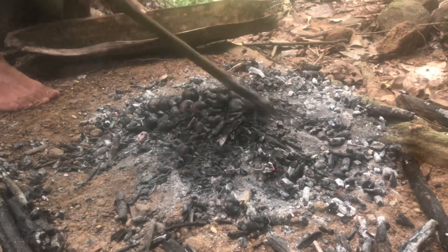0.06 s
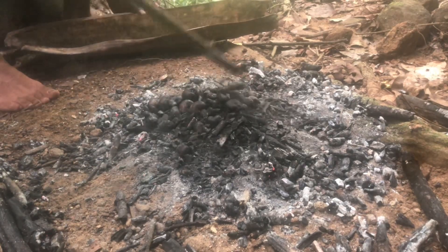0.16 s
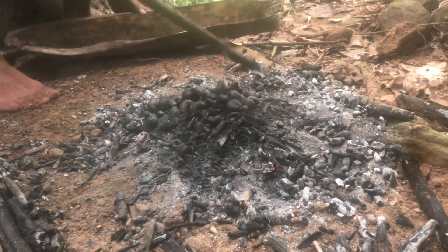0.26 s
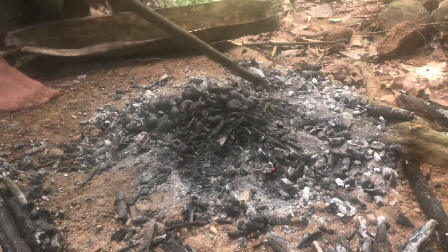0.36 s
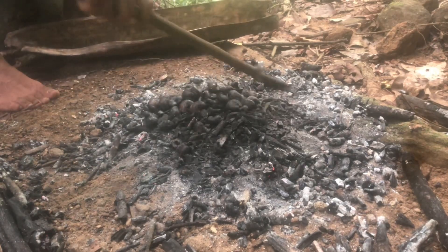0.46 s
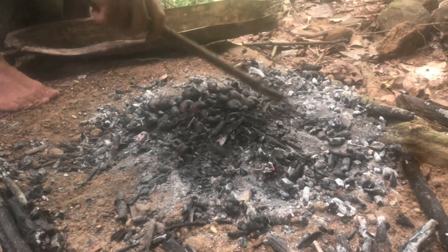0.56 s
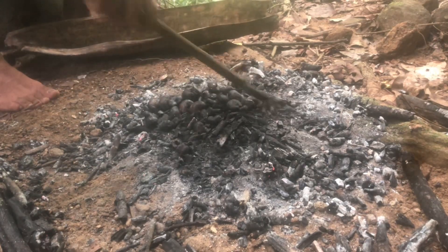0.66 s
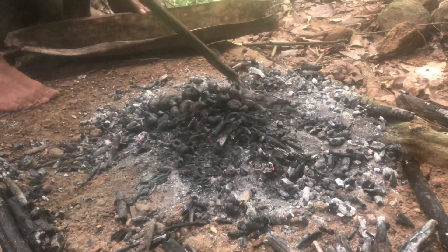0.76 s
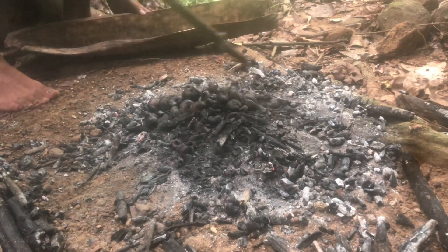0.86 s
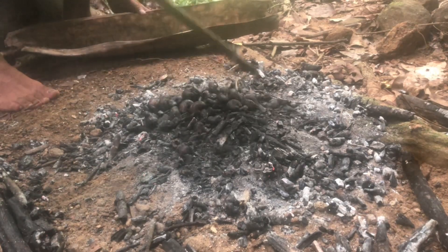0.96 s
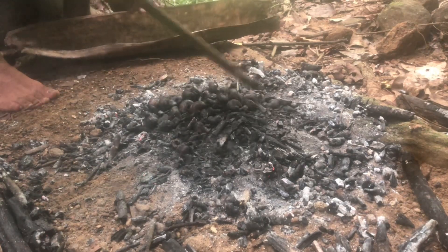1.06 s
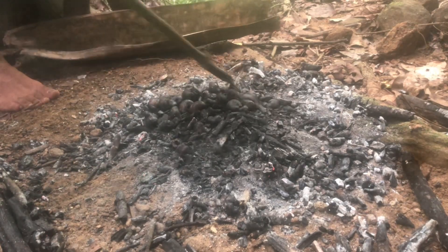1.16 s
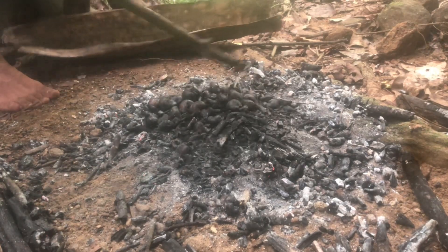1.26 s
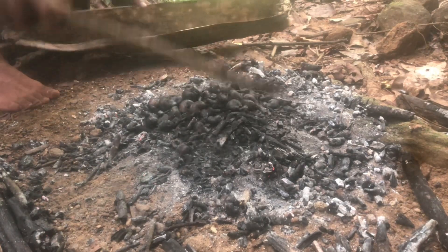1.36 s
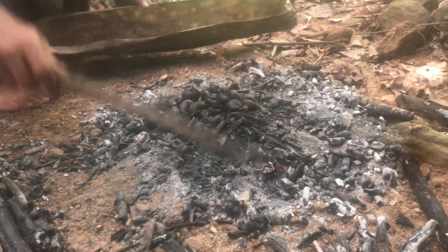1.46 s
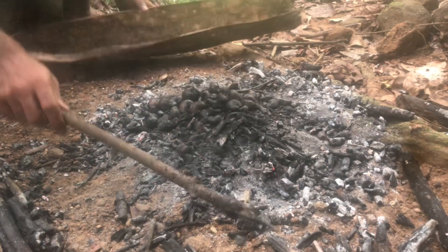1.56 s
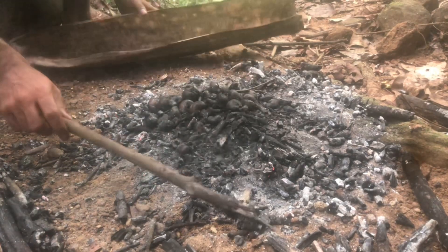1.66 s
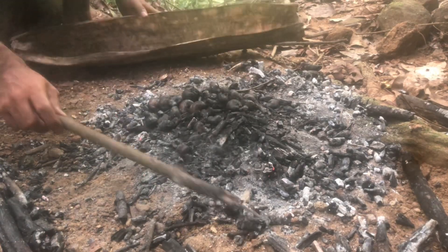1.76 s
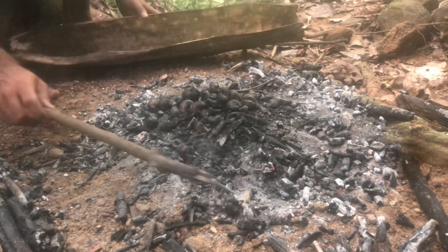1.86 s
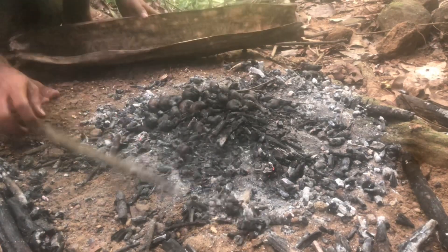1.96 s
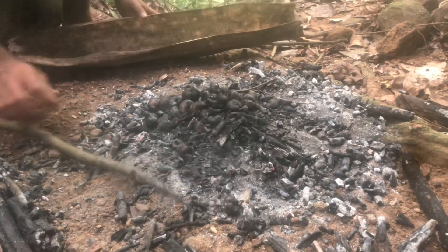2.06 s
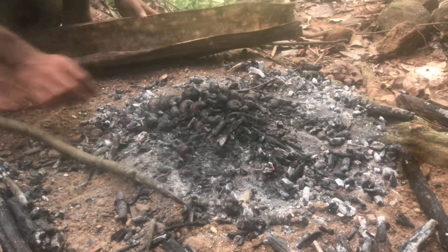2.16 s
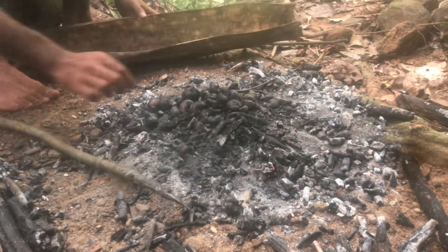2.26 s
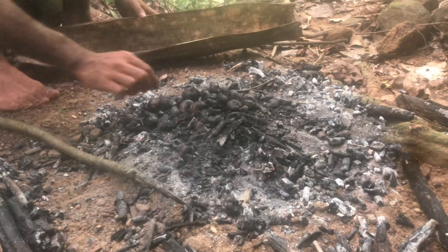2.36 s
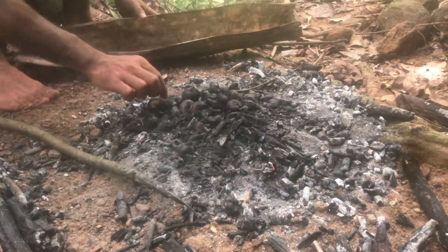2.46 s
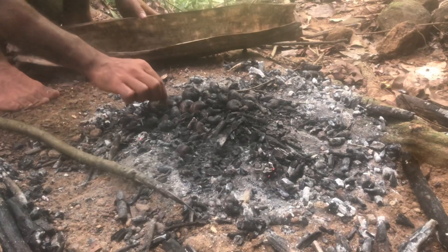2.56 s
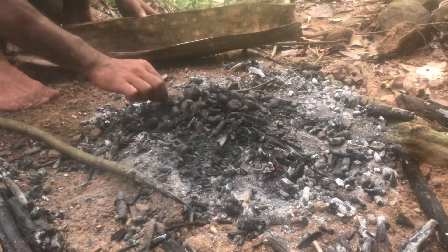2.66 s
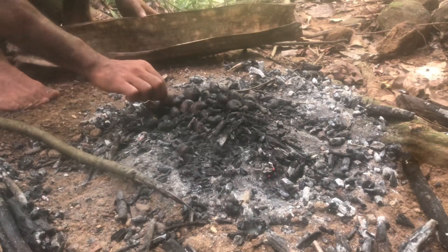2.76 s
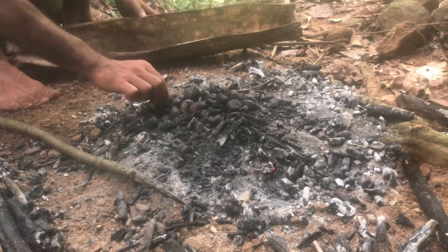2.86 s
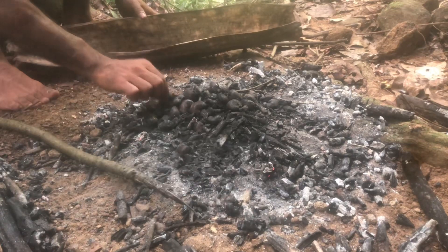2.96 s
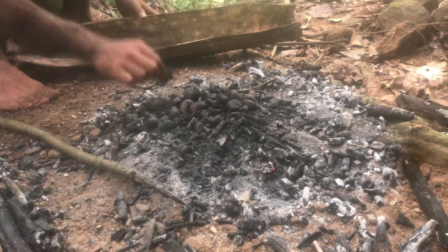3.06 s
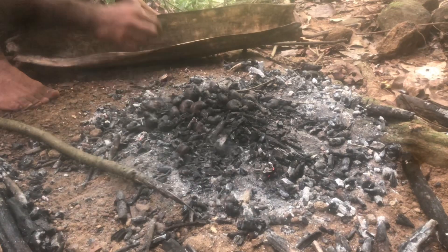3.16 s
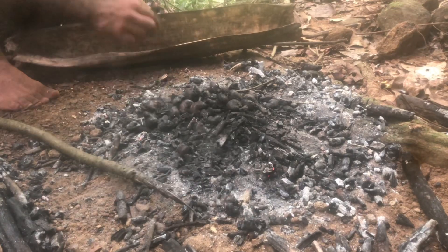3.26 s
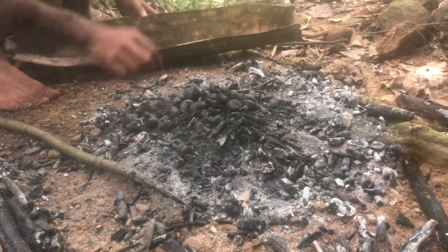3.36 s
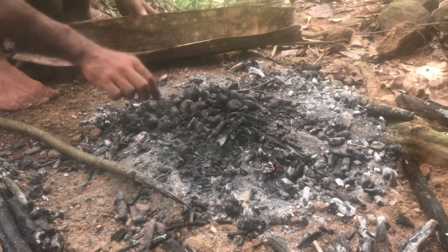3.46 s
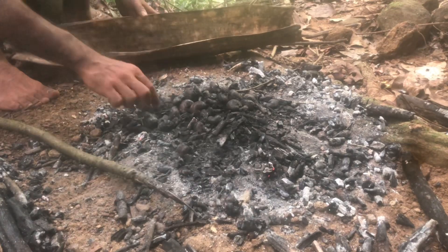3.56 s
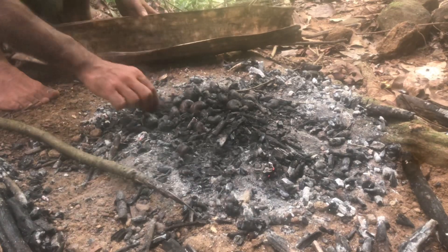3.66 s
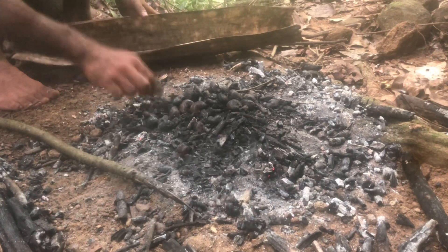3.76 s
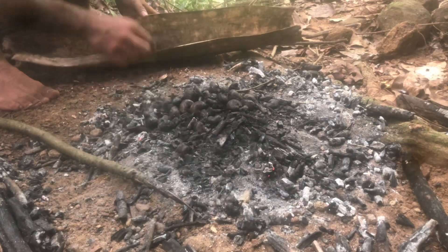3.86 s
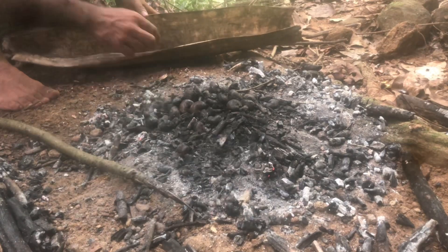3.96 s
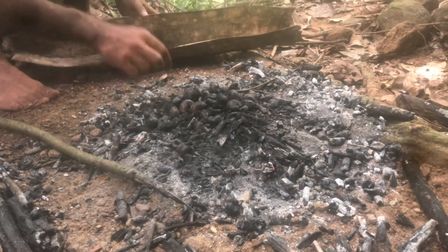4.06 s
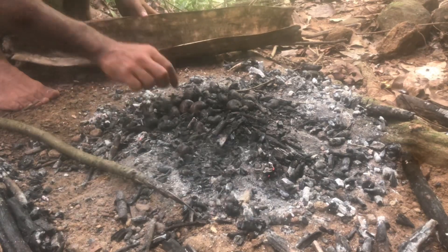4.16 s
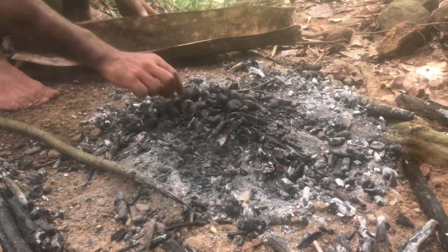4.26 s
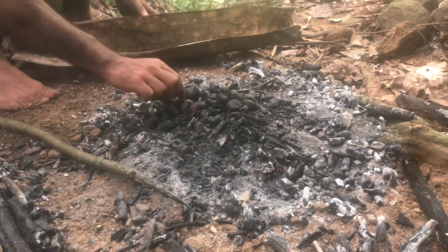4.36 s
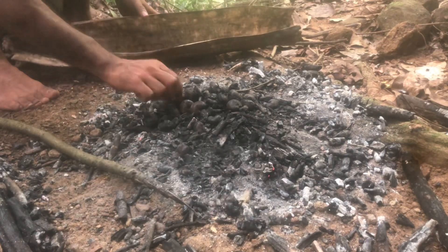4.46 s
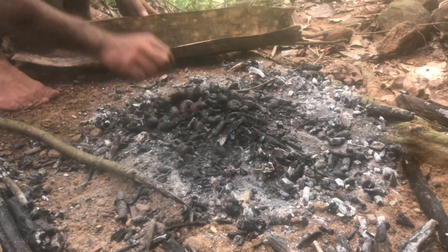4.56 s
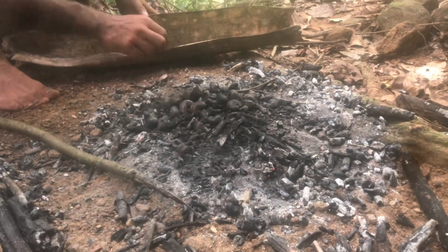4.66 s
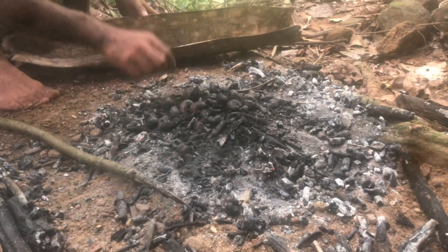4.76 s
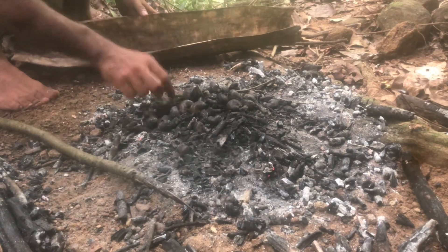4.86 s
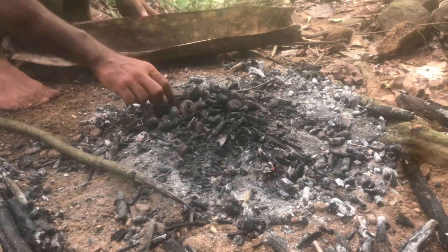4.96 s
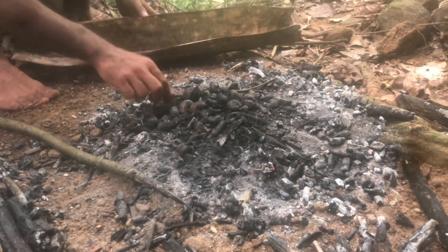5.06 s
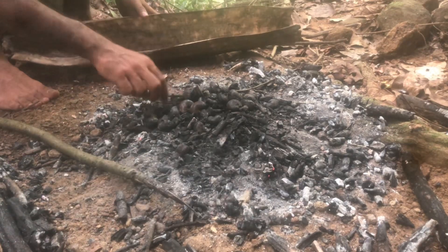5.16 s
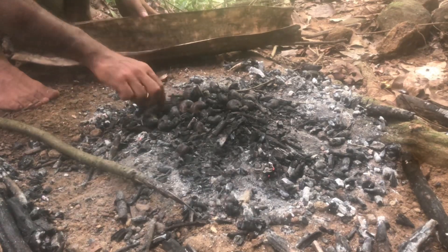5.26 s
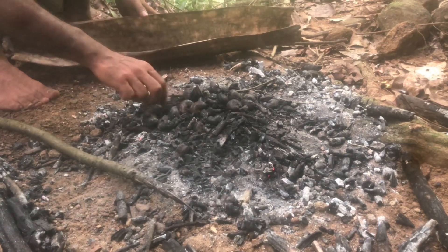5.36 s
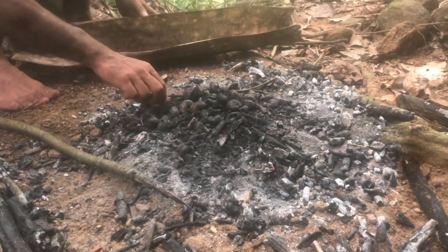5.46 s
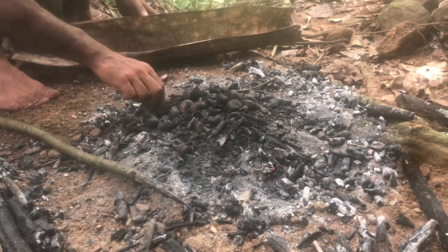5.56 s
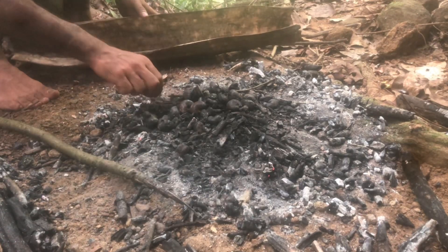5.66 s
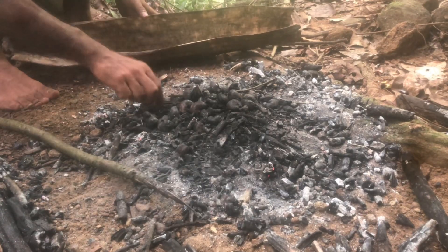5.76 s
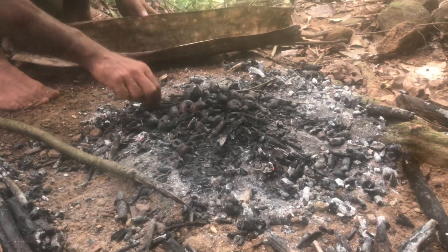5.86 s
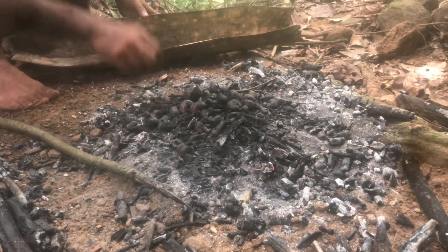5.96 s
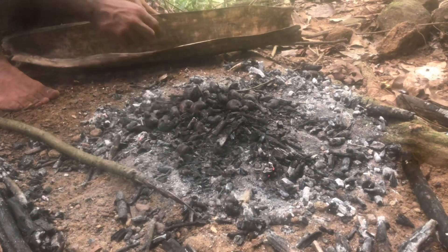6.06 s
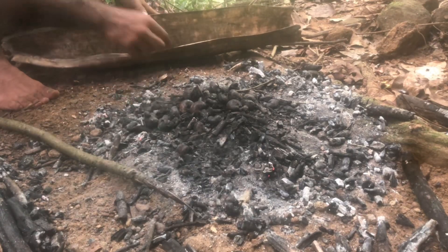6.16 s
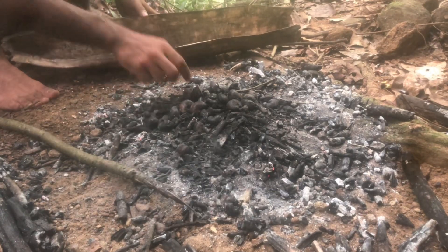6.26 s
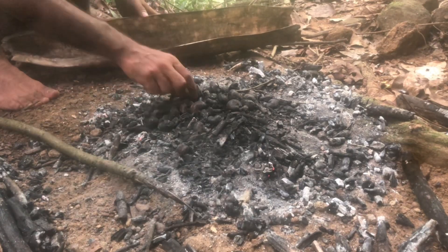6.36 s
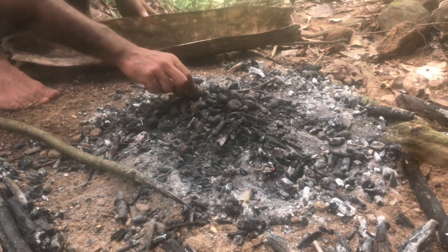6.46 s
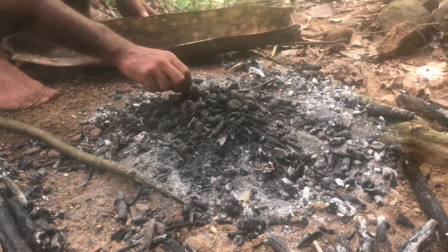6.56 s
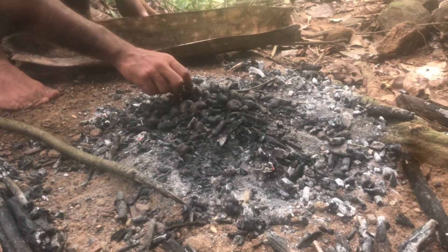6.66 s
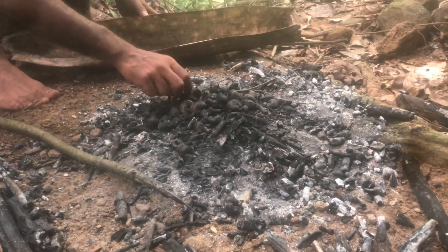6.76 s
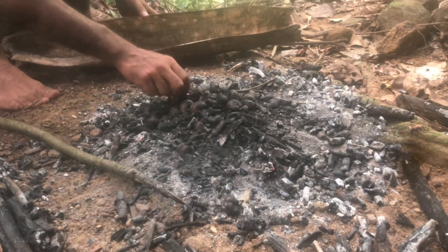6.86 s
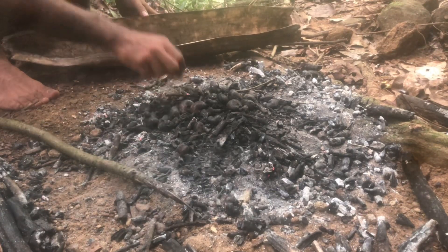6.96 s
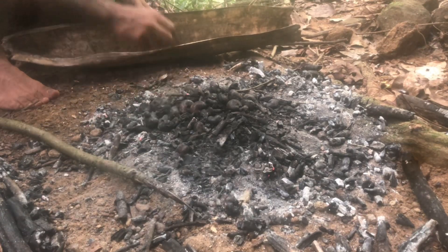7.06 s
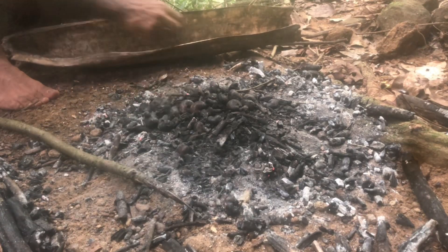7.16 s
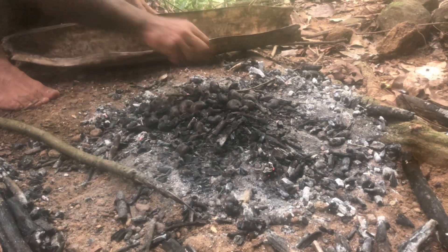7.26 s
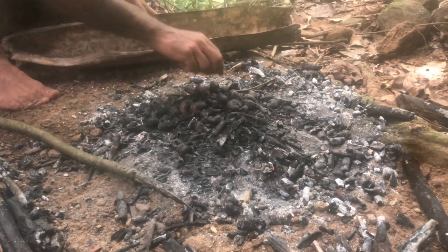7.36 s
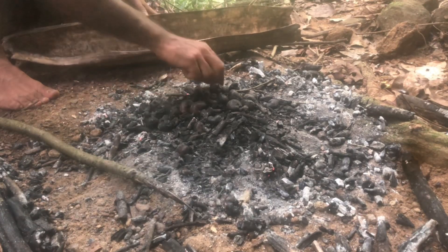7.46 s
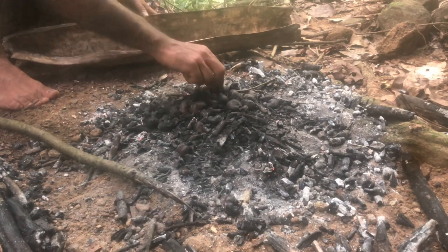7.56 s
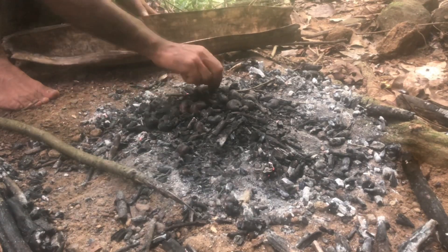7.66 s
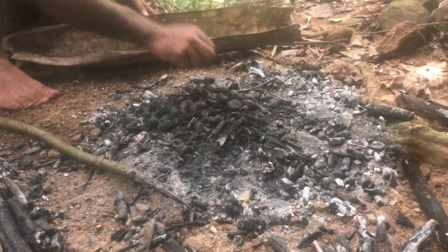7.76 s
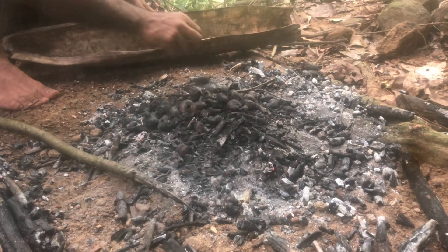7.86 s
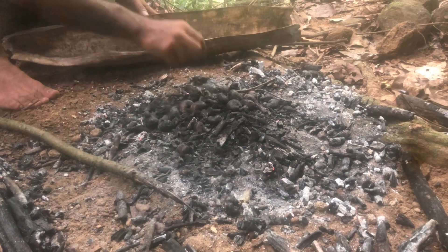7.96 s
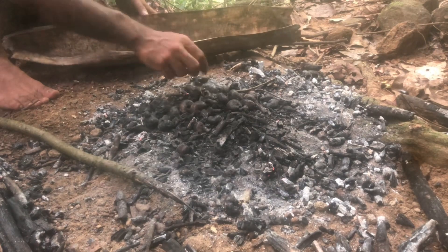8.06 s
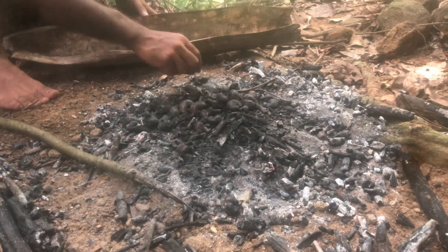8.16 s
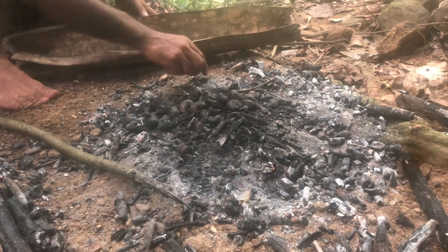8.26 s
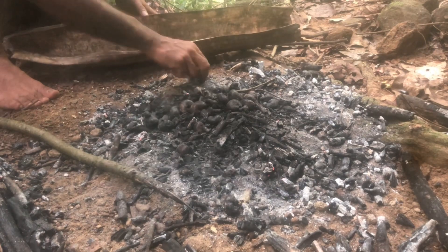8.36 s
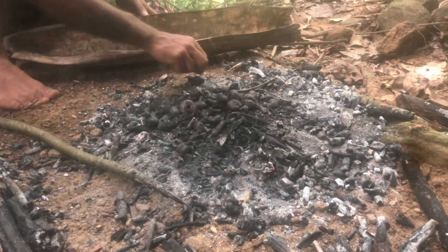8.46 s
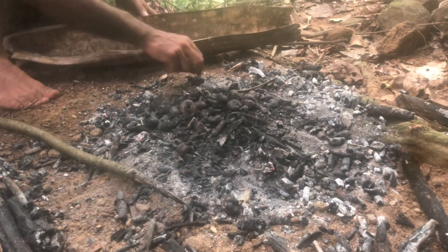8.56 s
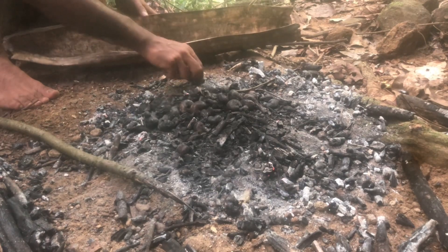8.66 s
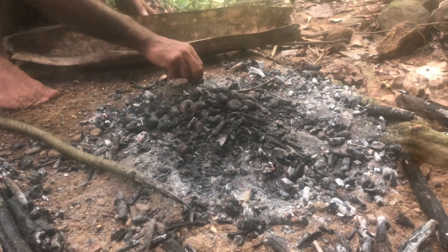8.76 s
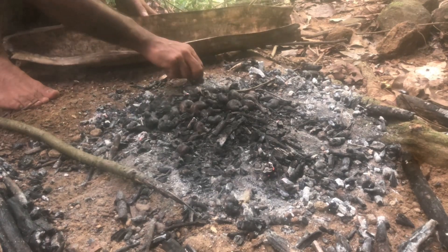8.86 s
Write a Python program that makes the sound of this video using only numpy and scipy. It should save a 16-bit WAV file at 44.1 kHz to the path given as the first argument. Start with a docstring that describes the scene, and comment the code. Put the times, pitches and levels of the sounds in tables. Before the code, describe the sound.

A quiet forest clearing, heard close: soft air, high insects hissing in gentle swells, and a very faint distant engine rising in pitch until about 3.2 s, then dropping and fading. From 0 to 1.9 s a stick rakes burnt charcoal with tiny crisp clicks, brittle snaps and short ashy scrapes, busiest around 1.2 and 1.8 s. At 2.0 s the stick drops with a light dry clack. At 3.3 s a softer woody tap leads to a loud hollow knock at 3.5 s as a nut hits a hollowed log, then rattles until 3.8. Another knocks at 4.1 and bounces at 4.25, fading quickly. Near quiet follows, with a tiny click at 4.9. A third nut lands at 6.2, bouncing at 6.4; a fourth clonks lower at 7.25, wobbling in dwindling taps until about 8.2. Faint crumbs settle from 8.2 to 8.8 s. Echo is short and subtle.

```python
"""A stick rakes the charcoal of a burnt-down fire in a forest and is dropped; nuts are then tossed into a log.
Raking is a dense run of clicks in filtered colours; each charcoal click is a coloured snap.
The stick and the nuts ring as dying sine modes, with coloured snaps for the shell's tick and the crunch.
A short tail of decaying noise echoes them. Behind lie filtered-noise air, insects hissing in three noise
bands that swell and sink, and a far engine of a few low harmonics over a rumble."""
import sys
import numpy as np
from scipy import signal
from scipy.fft import rfft, irfft
from scipy.io import wavfile

SR = 44100
rng = np.random.default_rng(int(sys.argv[2]) if len(sys.argv) > 2 else 0)


def digitize_waveform(pressure):
    """Quantize a signal to 16-bit integers and store it at the path in sys.argv[1].

    Rows of a 2-D input are taken as channels; values are limited to [-1, 1].
    """
    field = np.atleast_2d(pressure).T
    bounded = np.clip(field, -1, 1)
    quanta = np.round(bounded * 32767).astype(np.int16)
    wavfile.write(sys.argv[1], SR, quanta)


N = 393372

# A nut lands, bounces or wobbles in the log. Each row: contact in seconds, nominal level in dB, strongest ring in Hz,
# spread of the ring in octaves (0.15 at least is used), travel of the bending wave in seconds at 1 kHz,
# nominal thud in dB re level, bite of the shell in dB, crunch in Hz.
KNOCKS = [(3.3333, -32, 640, .38, 0.00068, -6, 0.5, 2000),
          (3.366, -43.5, 685, 0.36, 0.00085, -14, -1, 1800),
          (3.4848, -21, 777, 0.22, 0.00054, -23.5, -6.5, 1750),
          (3.509, -43, 756, 0.41, 0.00086, -6, 2, 1600), (3.574, -50, 800, .37, 0.0013, -9, 1, 1700),
          (3.5955, -38, 713, 0.3, 0.00076, -21, -10, 1600),
          (3.6425, -35.5, 805, 0.47, 0.00066, -17.5, 7, 1700), (3.688, -44, 840, 0.33, .0014, -17, 0, 1750),
          (3.7375, -40, 620, 0.54, 0.00059, -12, 3, 1900), (3.763, -50.5, 880, .35, 0.00075, -17, 2, 1700),
          (3.772, -52.5, 1070, .4, .0008, -16, 4, 1750), (3.792, -53.5, 773, 0.54, 0.00082, -16, -3, 1900),
          (3.798, -56.5, 1000, 0.35, 0.00078, -16, -3, 1700),
          (4.0718, -22.5, 550, 0.28, 0.0013, -15, -1.5, 1945),
          (4.083, -42, 1000, .3, 0.00074, -16, -5, 2100), (4.2264, -43, 800, 0.47, 0.0007, -9, 0, 1900),
          (4.2435, -28, 1120, .21, .0005, -14.5, 6, 1620), (4.254, -46, 1140, .3, 0.00066, -8, 4, 1450),
          (4.2585, -34.5, 610, 0.46, 0.00057, -15, 1, 1900),
          (4.2695, -44.5, 630, 0.32, 0.00091, -19, 7, 2200), (4.285, -47.5, 520, .4, 0.0013, -7, 2, 2000),
          (4.304, -44, 830, 0.36, 0.00034, -12, -2, 1500),
          (4.311, -43.5, 930, 0.42, 0.00077, -16, -3, 1500), (4.325, -48.5, 645, 0.42, 0.001, -16, 2, 1650),
          (4.342, -56.5, 1060, .3, 0.0015, -9, 10, 2000), (4.348, -55.5, 681, .35, 0.0011, -11, 4, 1700),
          (6.2319, -22.5, 630, 0.51, 0.0015, -22, 2.5, 1740), (6.2426, -46, 700, .4, 0.00062, -13, 2, 1750),
          (6.2495, -45, 1050, .27, 0.00076, -13, -3, 1600), (6.2897, -41, 603, 0.38, 0.0012, -16, -9, 2100),
          (6.3703, -51, 680, .3, .001, -15, -2, 1600), (6.379, -48, 680, 0.39, .0008, -22, -9, 1600),
          (6.3941, -26.5, 800, 0.36, 0.00084, -19.5, -3, 1560),
          (6.428, -48.5, 650, 0.14, 0.0011, -12, -3, 1700), (7.2545, -23, 500, .47, .0013, -27, 10, 2190),
          (7.2635, -43, 517, 0.34, 0.0017, -16.5, 9, 2300),
          (7.2684, -42, 950, 0.36, 0.00094, -15, 0.5, 2100), (7.3385, -41, 800, 0.27, .001, -12, -11, 2600),
          (7.3615, -38.5, 720, 0.65, 0.0005, -6.5, 3.5, 2200),
          (7.385, -50.5, 860, .4, 0.00124, -1, 4, 2000), (7.391, -52.5, 680, 0.41, 0.0011, -14, -11, 1700),
          (7.4405, -56, 710, 0.52, 0.0007, -7, 1, 2000), (7.4638, -47, 634, 0.48, 0.00082, -10.5, 2, 2100),
          (7.4755, -44.5, 780, .28, 0.00082, -17, -16, 1890),
          (7.482, -47, 560, 0.31, 0.0011, -20, -1, 2100), (7.503, -46, 700, 0.37, .0009, -14.5, -11, 2300),
          (7.514, -49, 707, 0.29, 0.0013, -16, -12, 1700), (7.532, -55.5, 690, .3, 0.0015, -21, -6, 1700),
          (7.775, -62, 754, 0.27, 0.0011, -15, -2, 1700), (7.795, -61.5, 912, .35, 0.00089, -10, -4, 1800),
          (7.816, -52, 636, 0.45, 0.0012, -7.5, -4, 1900), (7.831, -54, 710, 0.39, 0.00094, -13, -2, 1900),
          (7.9046, -52.5, 724, 0.41, 0.00085, -12, -2, 1900),
          (7.968, -51, 690, 0.34, 0.00089, -21, -7, 1800), (8.111, -64, 900, 0.46, 0.00091, -13, 18, 1900),
          (8.138, -69.5, 995, .5, 0.00094, -13, 16, 1800),
          (8.221, -66.5, 793, 0.21, 0.00089, -16, -0.5, 1770)]
# Modes of the hollowed log. Each row: nominal pitch in Hz, nominal weight in dB, t60 in seconds.
LOG_MODES = [(95.9, 0.5, 0.089), (119, 4, 0.08), (147, -2, 0.095), (255.2, 4, 0.049), (331, -0.5, 0.04),
             (389, -2.5, 0.028), (439, 4.5, 0.04), (485, 1, 0.034), (550, 4, 0.033), (621.5, 5, .03),
             (680, 3, 0.038), (738.6, 2.5, 0.025), (816, -5, 0.02), (921, 0, 0.029), (994, 0, 0.034),
             (1071, 0, 0.031), (1166, -9, 0.015), (1260, -10, .024), (1420, -5, 0.014), (1575, 2.5, 0.017),
             (1707, 6, 0.018), (1846, 6, 0.017), (2050, -4, .016), (2330, -4.5, .018), (2562, -6, 0.013),
             (2980, -4, 0.016)]
# Spectrum of a nut shell's tick. Each row: frequency in Hz, relative level in dB.
SHELL_SPECTRUM = [(1500, -31), (2800, 6), (3500, -2.5), (4400, 2.5), (5800, -2.5), (9000, -12), (12000, -9),
                  (16000, -24.5)]
# A bit of charcoal clicks or snaps. Each row: time in seconds, relative level in dB, centre in Hz.
COALS = [(0.097, -68, 2640), (0.257, -59, 1390), (0.549, -61.5, 8900), (0.606, -58.5, 4160),
         (0.684, -56, 5900), (0.808, -58, 5260), (1.011, -50, 740), (1.049, -64, 2600),
         (1.098, -62.5, 4500), (1.129, -53.5, 4480), (1.131, -53, 1870), (1.194, -57, 5000),
         (1.215, -45, 1000), (1.228, -52.5, 930), (1.385, -63.5, 2100), (1.599, -64, 4860),
         (1.792, -55, 920), (1.796, -52, 870), (1.808, -56, 750), (1.81, -65, 2200), (1.814, -56, 800),
         (1.821, -63.5, 2300), (1.839, -60, 1050), (1.843, -55.5, 700), (2.117, -57, 1430),
         (2.195, -62.5, 940), (4.018, -62.5, 8990), (4.908, -59.5, 9800), (8.416, -68, 1790),
         (8.744, -67, 1785), (8.771, -71, 5200)]
# Stirred embers settle. Each row: start in seconds, end in seconds, relative level of a click in dB.
SETTLING = [(0.147, 0.904, -68), (8.152, 8.839, -76)]
# Stick or nut drags over ash and wood. Each row: start in seconds, end in seconds, level in dB, centre in Hz,
# spread in octaves.
RAKES = [(0.015, 0.149, -68, 2970, 2.5), (0.662, 0.803, -67, 4460, 1.5), (1.207, 1.225, -66, 4000, 0.69),
         (1.584, 1.61, -61.5, 4060, 1.2), (1.774, 1.845, -67.5, 900, 0.88),
         (3.918, 3.984, -68.5, 930, 0.54)]
# The stick lands: time in seconds, level in dB.
STICK_DROP = (2.0253, -41)
# Modes of the stick. Each row: pitch in Hz, weight in dB, t60 in seconds.
STICK_MODES = [(153, -3, 0.055), (614, -2.5, 0.028), (780, -7, 0.038), (930, -12, 0.064), (1320, -6, 0.032),
               (1450, -2, 0.043), (1660, -12, 0.02), (2050, -14, 0.014), (2355, 10.5, 0.019),
               (2700, 9.5, 0.014), (2900, 5, 0.014), (4080, 10.5, 0.009), (4520, 1, 0.017)]
# Spectrum of the forest air. Each row: frequency in Hz, relative density in dB per Hz.
AIR_SPECTRUM = [(20, -6.5), (48, -1.5), (76, -9.5), (112, -5), (250, -13), (500, -13.5), (1000, -20),
                (2300, -28), (5200, -29.5), (7500, -23), (9800, -31), (12000, -32), (15500, -41.5)]
# Insect bands. Each row: centre in Hz, relative level in dB, dB of change per dB of chorus swell.
INSECT_BANDS = [(6684, -9, 1.2), (7385, -4.5, 0.9), (8450, -9, 2.3)]
# Swells of the chorus. Each row: crest in seconds, rise in dB.
SWELLS = [(0.03, 4.5), (0.6, 3), (1.2, 5.5), (2.12, 4), (2.65, 2), (2.94, 3.5), (3.42, 2), (3.799, 2.5),
          (4.12, 6.5), (4.399, 4.5), (5.06, 2), (6.04, 3), (6.42, 3.5), (7.28, 4.5), (7.8, 4.5)]
# Course of the far engine. Each row: time in seconds, nominal firing rate in Hz, level of the orders in dB.
ENGINE_COURSE = [(0, 25.2, -77), (1.15, 26.69, -70), (1.5, 28.4, -70), (2.05, 30, -68.5),
                 (2.399, 31.9, -69), (2.801, 32.6, -70), (3.15, 34.6, -72), (3.3, 30.44, -66),
                 (3.6, 29.2, -67), (4.05, 29.3, -71), (4.501, 25.42, -80), (5.3, 23.39, -76),
                 (5.9, 24.07, -72.5), (7, 25.5, -80.5), (8.9, 24.86, -87)]
# Engine orders. Each row: multiple of the firing rate, nominal weight in dB.
ENGINE_ORDERS = [(2, -8.5), (3, -2.5), (4, -6.5), (5, 2), (6, -11.5), (7, -15)]
# Length of the clearing's echo. Each row: frequency in Hz, t60 in seconds.
CLEARING_T60 = [(100, 0.28), (400, 0.18), (1100, 0.19), (2000, 0.2), (8000, .08)]
# Strength of the clearing's echo. Each row: frequency in Hz, level in dB.
CLEARING_DB = [(100, -5), (330, -12), (650, -25), (1050, -15.5), (1400, -11.5), (1850, -16), (2400, -14),
               (3200, -16), (8000, -21)]

SPECTRUM_HZ = np.fft.rfftfreq(4096, 1 / SR)


def amp(db):
    """Decibels to gain."""
    return 10 ** (np.asarray(db) / 20)


def evened(x):
    """Scales to rms 1."""
    return x / np.sqrt(np.mean(x ** 2) + 1e-20)


def blow(x):
    """Scales a short sound to the energy of 10 ms at rms 1."""
    return x / np.sqrt(np.sum(x ** 2) / (SR / 100) + 1e-20)


def read(points, hz):
    """Reads a curve on a log-frequency axis."""
    point_hz, value = np.transpose(points)
    return np.interp(np.log(hz + 1), np.log(point_hz + 1), value)


def hump(hz, centre_hz, octaves):
    """Spectrum in dB of a Gaussian bell around a centre frequency."""
    return -5 / np.log(10) * (np.log2((hz + 1) / centre_hz) / octaves) ** 2


def crumb_colour(centre_hz, octaves):
    """A hump on a spectrum that falls toward the treble, in dB."""
    return hump(SPECTRUM_HZ, centre_hz, octaves) - 10 * np.log10(SPECTRUM_HZ + 200)


def add(mix, start_s, sound):
    """Mixes a sound in at a time."""
    part = mix[max(round(start_s * SR), 0):][:len(sound)]
    part += sound[:len(part)]


def causal(db):
    """Minimum-phase click: the sharpest that has this spectrum, floored 80 dB below its peak."""
    log_gain = np.log(amp(np.maximum(db - np.max(db), -80)))
    circle = np.concatenate([log_gain, log_gain[-2:0:-1]])
    return np.fft.ifft(np.exp(np.conj(signal.hilbert(circle)))).real[:2048]


def noise(colour):
    """Steady noise of rms 1 whose spectrum in dB is a function of frequency."""
    spectrum = rfft(rng.standard_normal(N))
    return evened(irfft(spectrum * amp(colour(np.fft.rfftfreq(N, 1 / SR))), N))


def drift(per_s):
    """Slow random curve: straight lines between normal draws of standard deviation 1."""
    knots = rng.standard_normal(1024)
    return np.interp(np.arange(N) / SR * per_s, np.arange(len(knots)), knots)


def ring(hz, t60_s, travel_s, rise_cycles, punch):
    """One dying sine a mode; bending waves are slower at low pitch (travel_s at 1 kHz), so a blow chirps down."""
    arrival_s = travel_s * np.sqrt(1000 / hz[:, None])
    t = np.maximum(np.arange(SR // 4) / SR - arrival_s, 0)
    cycles = t * hz[:, None]
    swell = 1 - np.exp(-(cycles / rise_cycles) ** 2)
    # the wave straight from the blow outweighs its reflections
    first_pass = 1 + punch * np.exp(-(cycles / 2) ** 2)
    decay = np.exp(-np.log(1000) * t / t60_s[:, None])
    return swell * first_pass * decay * np.sin(2 * np.pi * cycles)


def snap(db, t60_s, grit):
    """A sharp contact and a short crumble after it, in one colour."""
    t = np.arange(2048) / SR
    crumble = blow(rng.standard_normal(len(t)) * np.exp(-np.log(1000) * t / t60_s))
    contact = blow(1. * (t == 0))
    return blow(signal.fftconvolve(grit * crumble + contact, causal(db)))


def forest(air_db=-68.5, insects_db=-77.5, flutter_db=1.0, swell_s=0.15, lull_db=-1.5):
    """Still air and insects high in the trees, which turn shriller as they swell."""
    t = np.arange(N) / SR
    out = amp(air_db + 0.29 * drift(per_s=8.5)) * noise(lambda f: read(AIR_SPECTRUM, f))
    chorus_db = lull_db + sum(rise * np.exp(-((t - crest) / swell_s) ** 2) for crest, rise in SWELLS)
    for hz, db, follow in INSECT_BANDS:
        level_db = insects_db + db + follow * chorus_db + flutter_db * drift(per_s=32)
        out += amp(level_db) * noise(lambda f: hump(f, hz, octaves=.075))
    return out


def far_engine(fading_db=2.0, rumble_db=-77.5, usual_db=-75, rumble_follows=0.55):
    """Only the lowest orders carry this far, each fading on its own, over a low rumble that swells with them."""
    s, *columns = np.transpose(ENGINE_COURSE)
    rate_hz, level_db = (np.interp(np.arange(N) / SR, s, column) for column in columns)
    turns = np.cumsum(rate_hz * (1 + .005 * drift(per_s=10))) / SR
    orders = np.zeros(N)
    for multiple, db in ENGINE_ORDERS:
        orders += amp(db + fading_db * drift(per_s=2.7)) * np.sin(2 * np.pi * multiple * turns)
    rumble = noise(lambda f: hump(f, centre_hz=135, octaves=0.78))
    rumble_gain = amp(rumble_db + rumble_follows * (level_db - usual_db))
    return amp(level_db) * evened(orders) + rumble_gain * rumble


def raking(grains_per_s=1700, grain_db=3.5):
    """Crumbs of ash crush in a dense run of tiny clicks."""
    out = np.zeros(N)
    for start_s, end_s, level_db, centre_hz, octaves in RAKES:
        n = max(round((end_s - start_s) * SR), 64)
        sizes = amp(grain_db * np.minimum(rng.exponential(1, n), 4)) * rng.choice([-1, 1], n)
        crumbs = sizes * (rng.random(n) < grains_per_s / SR)
        stroke = crumbs * signal.windows.tukey(n, .4)
        scrape = signal.fftconvolve(stroke, causal(crumb_colour(centre_hz, octaves)))
        add(out, start_s, amp(level_db) * scrape / np.std(scrape[:n]))
    return out


def clearing(x, build_s=0.0054):
    """Ground, logs and trunks scatter a short tail: noise that dies at its own rate in each band."""
    f, t, z = signal.stft(rng.standard_normal(SR // 2), SR, nperseg=256)
    decay = np.exp(-np.log(1000) * t / read(CLEARING_T60, f)[:, None])
    decay *= 1 - np.exp(-(t / build_s) ** 2)
    energy = 128 * np.sum(decay ** 2, axis=1, keepdims=True)  # 128 samples between frames
    decay *= amp(read(CLEARING_DB, f))[:, None] / np.sqrt(energy)
    tail = signal.istft(z * decay, SR, nperseg=256)[1]
    return signal.fftconvolve(x, tail)[:N]


def breadth(centre_hz, click_octaves=0.33, crumble_octaves=0.9, crumble_hz=2220, range_octaves=0.42):
    """Octaves a bit sounds over: middling bits crumble broadly, lumps and splinters click near one pitch."""
    return click_octaves + crumble_octaves * amp(hump(centre_hz, crumble_hz, range_octaves))


def settling(count=3, centre_hz=2200, scatter_octaves=1.0):
    """A few crumbs shift at random moments: rows like those of COALS."""
    rows = []
    for start_s, end_s, level_db in SETTLING:
        for _ in range(count):
            pitch_hz = centre_hz * 2 ** (scatter_octaves * rng.uniform(-2.1, 1))
            rows.append((rng.uniform(start_s, end_s), level_db, pitch_hz))
    return rows


def charcoal(click_db=-4.0):
    """Brittle bits click; the smaller the bit, the higher its pitch."""
    out = np.zeros(N)
    for s, level_db, centre_hz in COALS + settling():
        colour = crumb_colour(centre_hz, breadth(centre_hz))
        add(out, s, amp(level_db + click_db) * snap(colour, t60_s=0.049, grit=2.1))
    return out


def dropped_stick(crack_db=-17, splinter_db=-6):
    """The dry stick clacks on the ground and crushes the crumbs under it."""
    out = np.zeros(N)
    hz, db, t60_s = np.transpose(STICK_MODES)
    s, level_db = STICK_DROP
    clack = blow(amp(db) @ ring(hz, t60_s, travel_s=0.00043, rise_cycles=0.7, punch=0.48))
    splinter = snap(hump(SPECTRUM_HZ, centre_hz=2630, octaves=0.51), t60_s=0.024, grit=0.39)
    crack = snap(hump(SPECTRUM_HZ, centre_hz=5000, octaves=1.0), t60_s=0.024, grit=1.3)
    add(out, s, amp(level_db) * clack)
    add(out, s, amp(level_db + splinter_db) * splinter)
    add(out, s, amp(level_db + crack_db) * crack)
    return out


def nuts(spot_db=1.5, thud_db=-1.5, grit_db=-9.5, cut_share=0.58, hard_db=-22, upper_octaves=0.35):
    """Each landing spot favours the log's modes around one pitch; the hard shell adds a tick and a dry crunch."""
    out = np.zeros(N)
    hz, db, t60_s = np.transpose(LOG_MODES)
    low, high = hz < 350, hz > 1300
    body = ~low & ~high
    log_wall = signal.butter(3, 85, "high", fs=SR, output="sos")  # the log is too small for deep bass
    for s, level_db, ring_hz, spread, travel_s, thud, bite_db, crunch_hz in KNOCKS:
        # the body's ring is cut below a share of its strongest pitch, so a knock carries little bass
        body_cut = signal.butter(4, cut_share * ring_hz, "high", fs=SR, output="sos")
        upper_db = -18 + 0.33 * bite_db
        tick_db = -35 + bite_db - 0.22 * (level_db + 36)  # grows more slowly than the knock
        spot, detune = rng.standard_normal((2, len(hz)))
        punch = 0.47 * amp(0.98 * (level_db - hard_db))  # a hard blow clacks, a light touch rings
        rings = ring(hz * (1 + 0.023 * detune), t60_s, travel_s, rise_cycles=1.0, punch=punch)
        modes = amp(db + spot_db * spot)[:, None] * rings

        body_ring = amp(hump(hz[body], ring_hz, max(spread, .15))) @ modes[body]
        upper_ring = amp(hump(hz[high], crunch_hz, upper_octaves)) @ modes[high]
        knock = blow(signal.sosfilt(body_cut, body_ring))
        knock += amp(thud + thud_db) * blow(signal.sosfilt(log_wall, modes[low].sum(0)))
        knock += amp(upper_db) * blow(upper_ring)
        tick = snap(read(SHELL_SPECTRUM, SPECTRUM_HZ), t60_s=0.018, grit=6.3)
        crunch = snap(hump(SPECTRUM_HZ, crunch_hz, octaves=0.32), t60_s=0.021, grit=1.7)
        add(out, s - .001, amp(level_db + .5 * punch) * knock)
        add(out, s, amp(level_db + tick_db) * tick)
        add(out, s, amp(level_db + upper_db + grit_db) * crunch)
    return out


def scene(stick_echo_db=-9):
    """The work at the fire, its echo and the forest around it."""
    far = forest() + far_engine()
    stick = dropped_stick()
    near = raking() + charcoal() + nuts()
    echo = clearing(near + amp(stick_echo_db) * stick)
    return (near + stick + echo + far)[None]


def record(dry, low_cut_hz=50, edge_hz=15750):
    """The microphone sheds the deepest bass; a low-pass then limits the band."""
    thinned = signal.sosfilt(signal.butter(3, low_cut_hz, "high", fs=SR, output="sos"), dry)
    low_pass = signal.firwin(511, edge_hz, window=("kaiser", 9), fs=SR)
    return signal.oaconvolve(thinned, low_pass[None], "same")


dry = scene()
out = record(dry)
digitize_waveform(out)
```